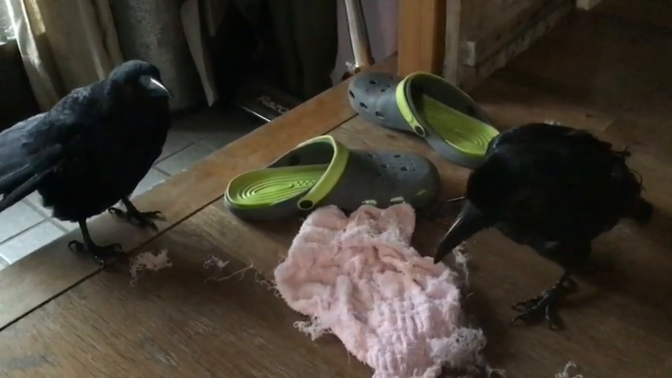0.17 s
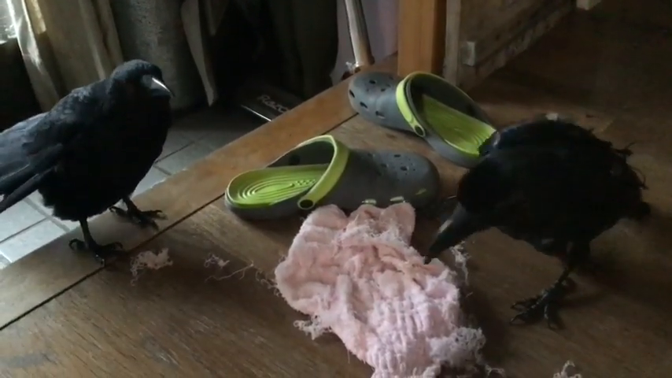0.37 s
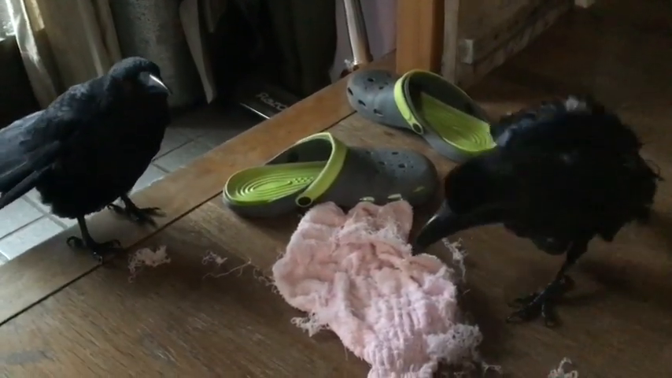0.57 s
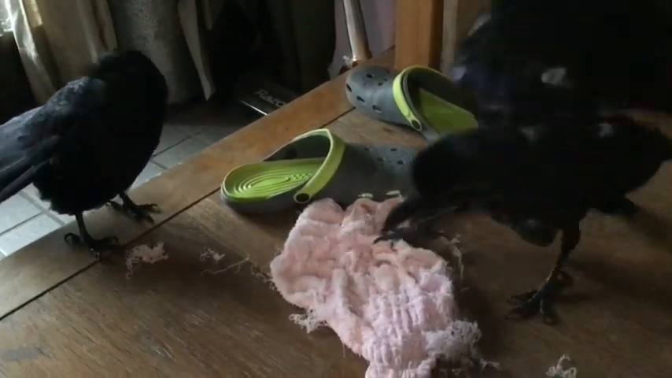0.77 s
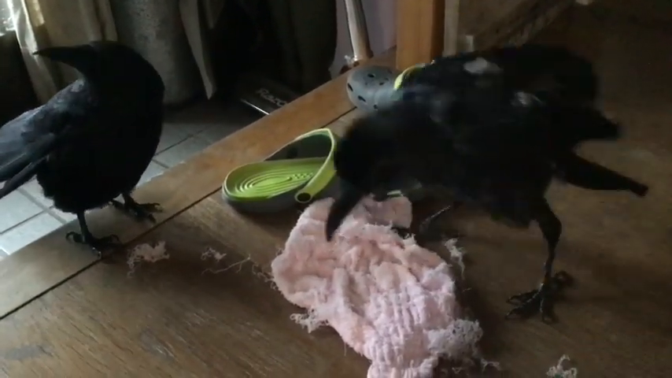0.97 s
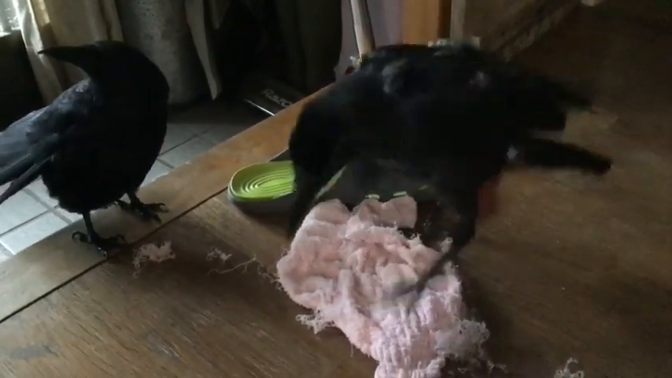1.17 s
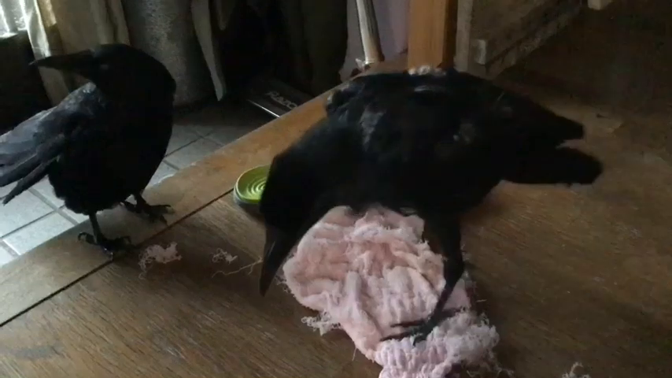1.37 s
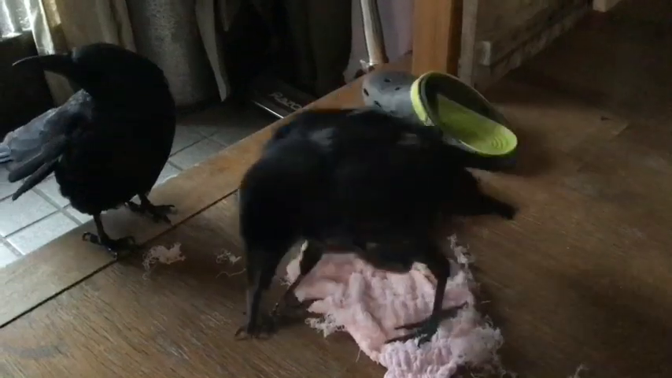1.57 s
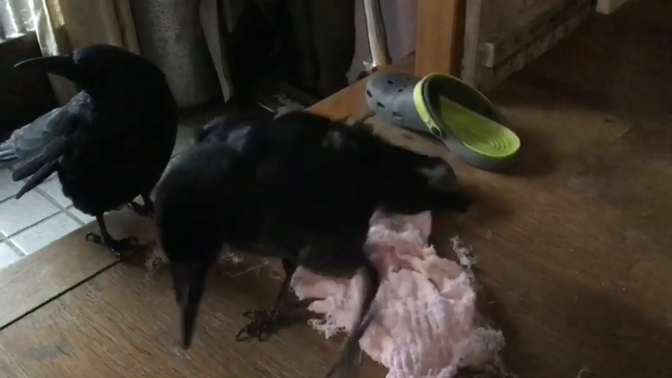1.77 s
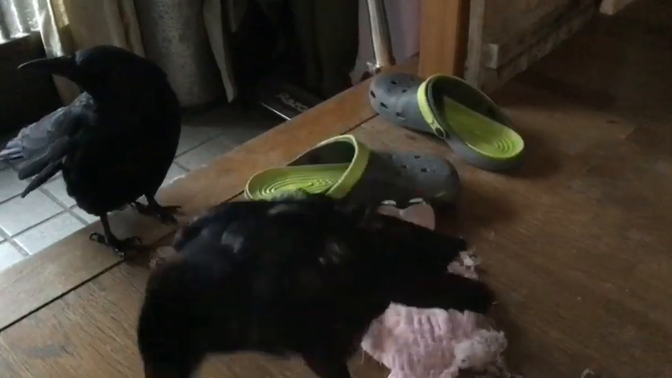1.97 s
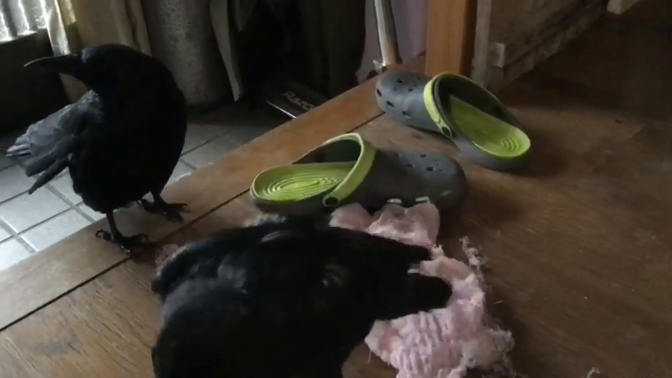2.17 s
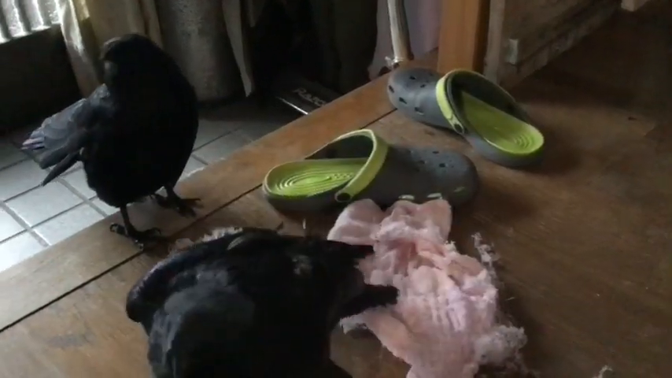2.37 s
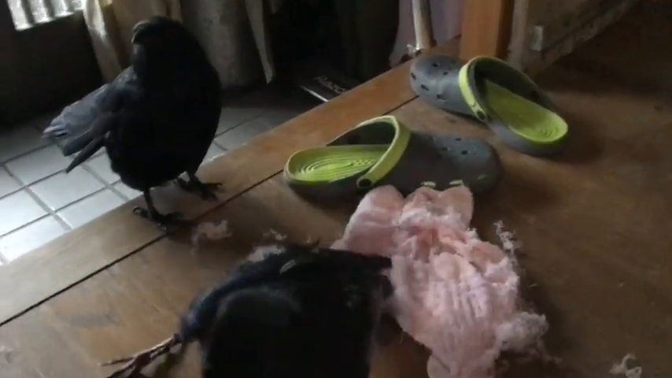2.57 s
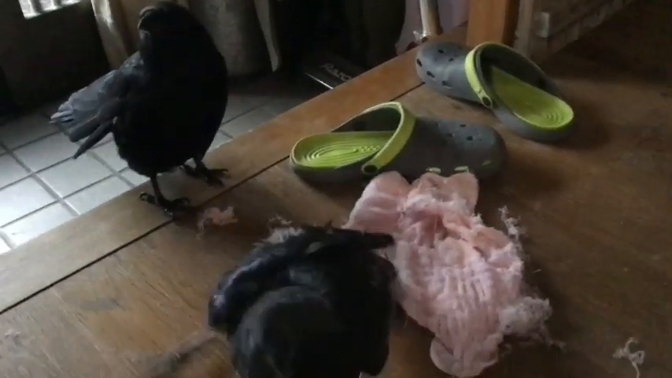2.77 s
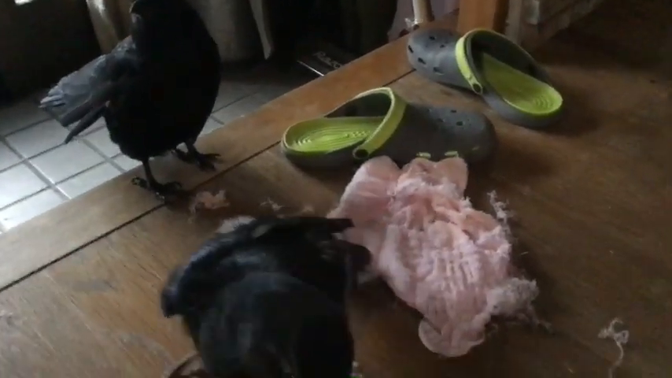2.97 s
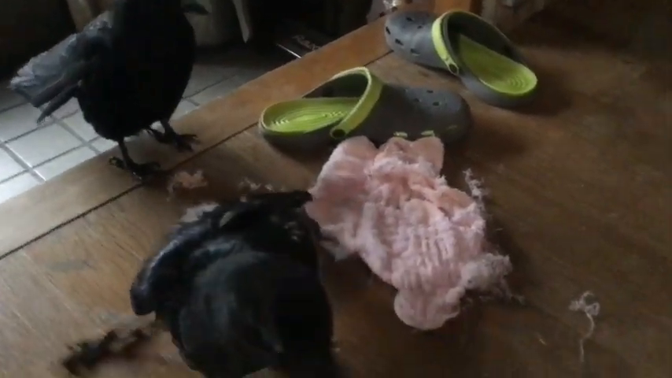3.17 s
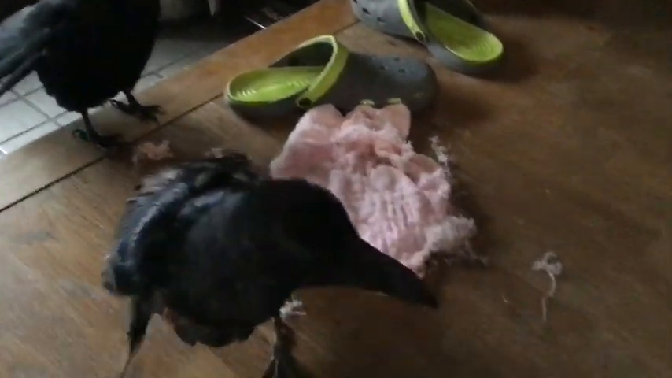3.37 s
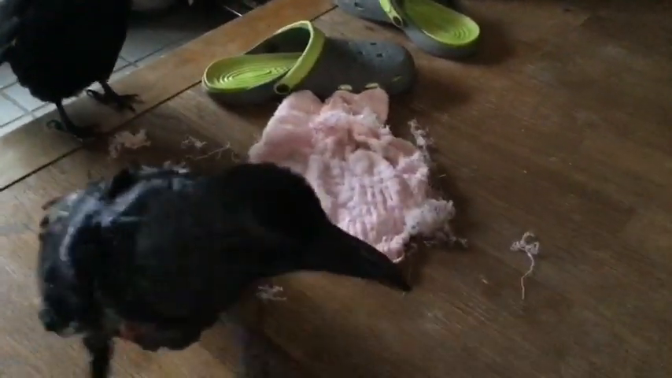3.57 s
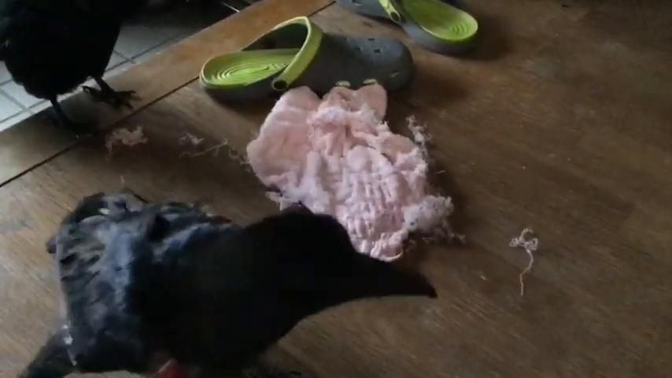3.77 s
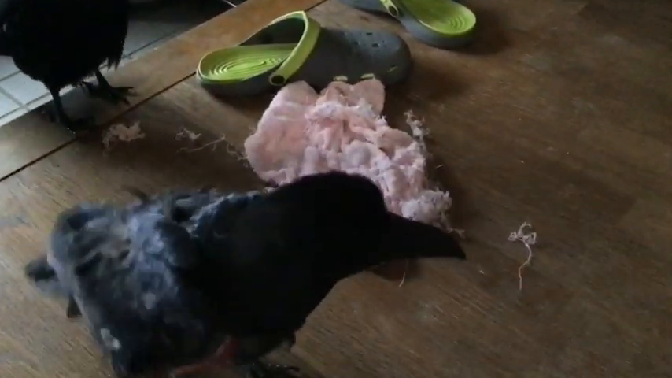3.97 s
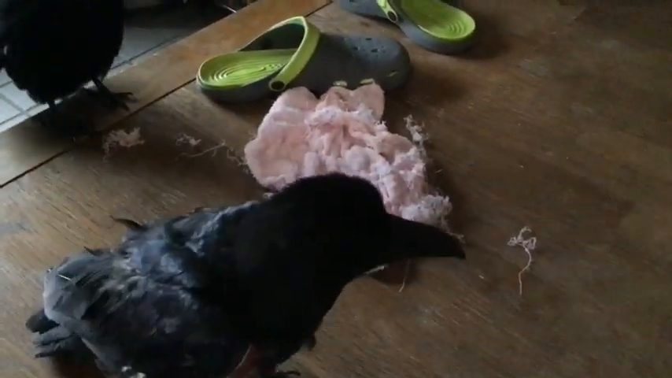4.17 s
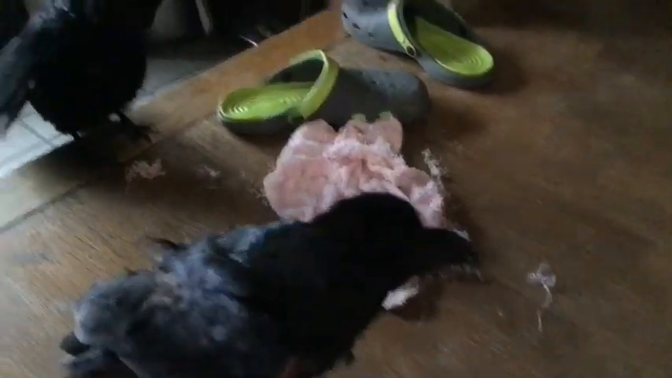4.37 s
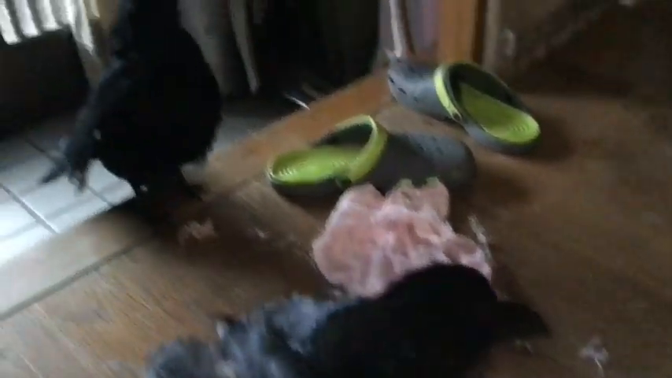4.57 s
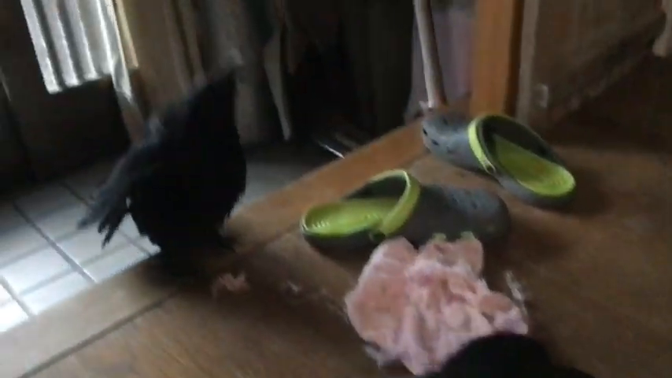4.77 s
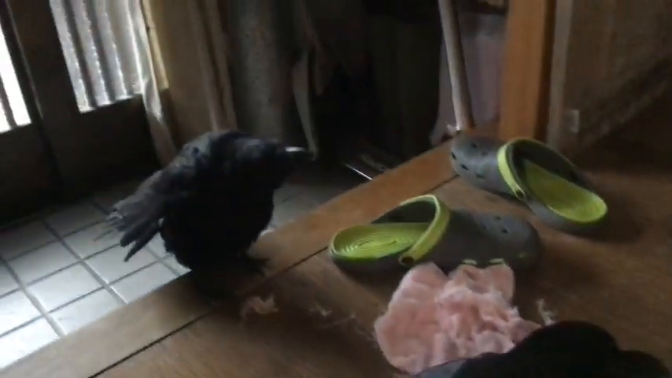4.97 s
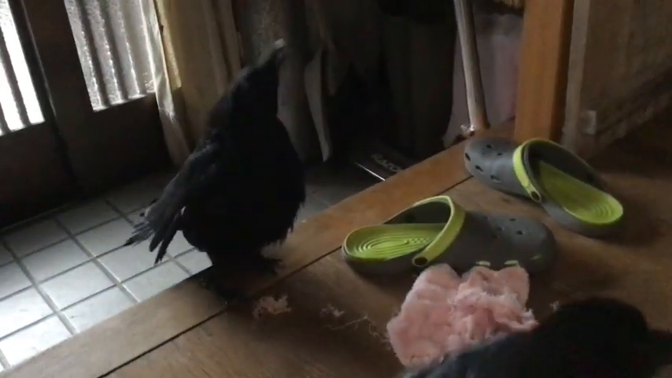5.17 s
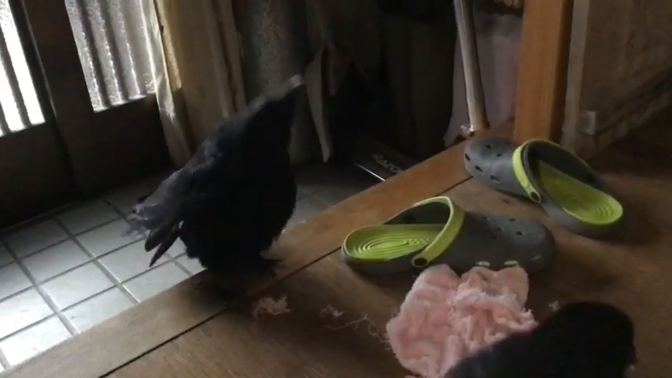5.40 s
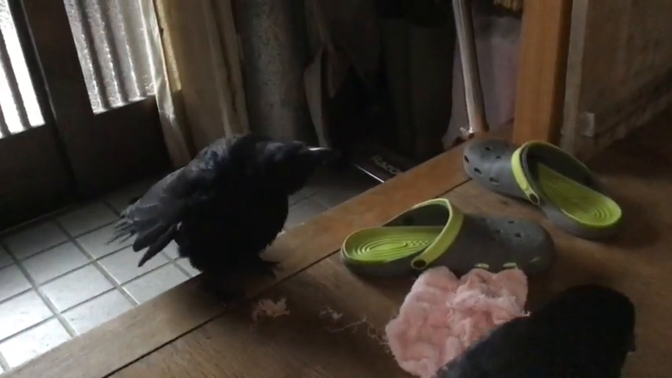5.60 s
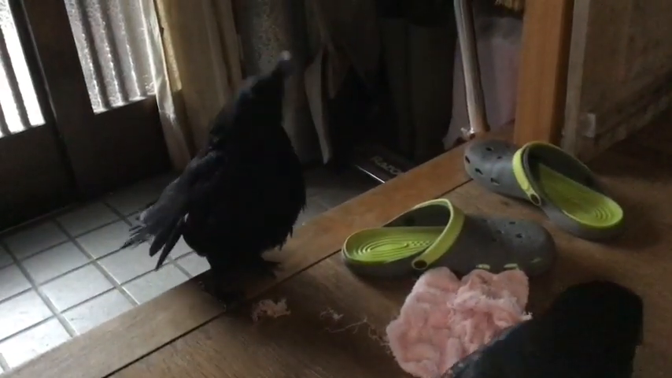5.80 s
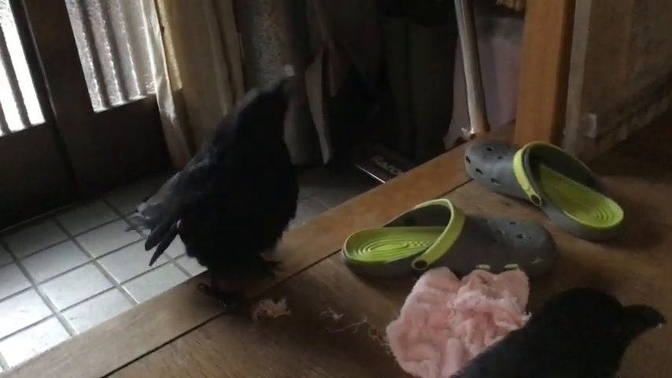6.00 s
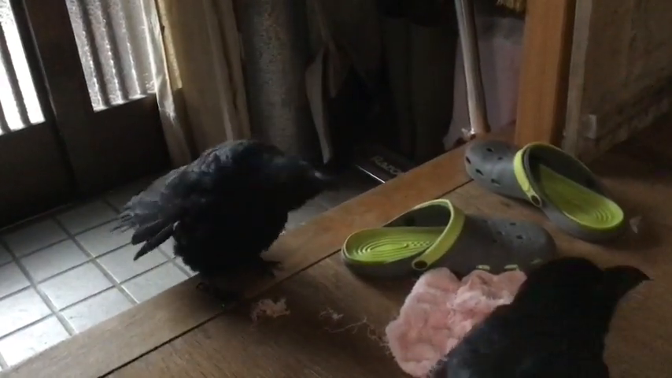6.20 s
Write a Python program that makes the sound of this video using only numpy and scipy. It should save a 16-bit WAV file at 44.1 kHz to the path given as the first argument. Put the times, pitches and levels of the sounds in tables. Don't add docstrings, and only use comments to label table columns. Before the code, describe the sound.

A quiet indoor hallway with a faint hiss and barely audible hum. From 0 to 1.5 seconds there are only soft low bumps of the hand-held microphone, light claw ticks and thin feather rustles near 0.75 and 1.0. Sharp, hard claw taps on wooden boards come at 1.56, 1.9, 2.23 and 2.5, some doubled, with a run of dull handling thuds from 2.35 to 3.5. Bright, dry brushing flicks at 3.3 and swells to 3.64, alongside more taps at 3.43 and 3.64. Then a crow caws loudly at 3.86, 4.49, 5.11 and 5.76, each about a quarter second: hoarse at the onset, clearer, then raspy again, with a rapid throaty buzz and short room reverberation. A faint cluck precedes the second. Between caws come rustles, low bumps and claw clicks, notably at 5.06; a last swish and tick fall near 6.18.

```python
import sys
import numpy as np
from scipy import signal
from scipy.io import wavfile
from scipy.ndimage import uniform_filter1d

SR = 44100
rng = np.random.default_rng(int(sys.argv[2]) if len(sys.argv) > 2 else 0)


def gain_from_decibels(decibels):
    exponent = np.asarray(decibels, float) / 20
    return 10 ** exponent


def output_pcm(signal):
    pcm = np.clip(np.atleast_2d(signal).T, -1, 1) * 32767
    wavfile.write(sys.argv[1], SR, np.round(pcm).astype(np.int16))


N = 275184

# onset in seconds, start of steady throbs in seconds, steady throb period in seconds, end in seconds.
CAWS = [
    (3.858, 3.909, .0174, 4.101),
    (4.490, 4.534, .0172, 4.731),
    (5.112, 5.167, .0170, 5.366),
    (5.762, 5.800, .0169, 5.997),
]
# time in seconds, pitch in Hz, effort in dB.
EFFORT = [
    [(3.858, 382, -19), (3.875, 394, -10), (3.935, 412, 2.5), (3.98, 425, -2), (4.04, 435, -.5),
     (4.1, 430, -5)],
    [(4.49, 396, -20), (4.523, 399, -7), (4.56, 418, 0), (4.62, 414, -1), (4.685, 405, -1.5),
     (4.73, 395, -13)],
    [(5.114, 399, -17), (5.14, 401, -7), (5.2, 420, 1), (5.26, 414, 1.5), (5.31, 413, 0), (5.36, 408, -8)],
    [(5.762, 381, -15), (5.8, 402, -2), (5.84, 419, 1), (5.89, 428, .5), (5.94, 436, 0), (6.0, 419, -4)],
]


def rms_one(x):
    return x / np.sqrt(np.mean(x ** 2) + 1e-20)


def in_time(rows):
    s, *columns = np.transpose(rows)
    return [np.interp(np.arange(N) / SR, s, c) for c in columns]


def at_hz(points, hz):
    table_hz, values = np.array(points).T
    return np.interp(np.log(hz), np.log(table_hz), values)


def passed(x, hz, kind, order=2):
    return signal.sosfilt(signal.butter(order, hz, kind, fs=SR, output="sos"), x + 1e-18)


def resonate(x, modes, order=1):
    out = 0
    for k, (hz, width, level_db) in enumerate(modes):
        r = np.exp(-np.pi * width / SR)
        numerator = [(1 - r * r) / 2, 0, (r * r - 1) / 2]
        denominator = [1, -2 * r * np.cos(2 * np.pi * hz / SR), r * r]
        y = x + 1e-18
        for _ in range(order):
            y = signal.lfilter(numerator, denominator, y)
        out = out + (-1) ** k * gain_from_decibels(level_db) * y
    return out


def wobble(rate):
    r = np.exp(-2 * np.pi * rate / SR)
    settled = signal.lfilter([1], [1, -2 * r, r * r], rng.standard_normal(N + 9000))[9000:]
    return rms_one(settled)


def bands(white, gain_at):
    edges = 25 * 2 ** np.arange(0, 9.6, .5)
    return sum(gain_at(np.sqrt(a * b)) * passed(white[k % 2], [a, b], "band")
               for k, (a, b) in enumerate(zip(edges, edges[1:])))


def hush():
    # frequency in Hz, density in dB per Hz.
    hush_spectrum = [(24, -44), (40, -27), (87, -10), (220, 0.5), (412, -13), (479, -7), (733, -12.5),
                     (942, -8), (1150, -17.5), (1550, -11.5), (3140, -26), (9450, -24), (13800, -35),
                     (16000, -35)]
    hush_db, hum_hz, hum_db = -64, 99, -71.5
    air = rms_one(bands(rng.standard_normal((2, N)), lambda hz: gain_from_decibels(at_hz(hush_spectrum, hz))))
    hum = np.sin(2 * np.pi * hum_hz * np.arange(N) / SR)
    return gain_from_decibels(hush_db) * air + gain_from_decibels(hum_db + 2.2 * wobble(6.5)) * hum


def thumps():
    # time
    # in seconds, peak in dB.
    single_shifts = [(0.195, -38), (0.758, -36), (0.778, -46), (1.231, -56), (2.345, -38.5), (2.379, -45),
                     (2.458, -45), (2.498, -43), (2.679, -42), (2.843, -38), (2.968, -40), (3.052, -40),
                     (3.084, -38.5), (3.184, -53), (3.316, -39), (3.352, -46), (3.392, -39), (3.466, -40.5),
                     (3.655, -34), (3.685, -47), (4.716, -31), (4.951, -39), (5.066, -49), (5.287, -34),
                     (5.472, -41), (5.935, -38)]
    # time in seconds, peak in dB.
    double_shifts = [(2.419, -44), (2.525, -34), (2.627, -38.5), (2.742, -39), (2.922, -37.5), (3.143, -48)]
    # frequency in Hz, width in Hz, level in dB.
    shell_modes = [(102.6, 64, -7.5), (156, 72, 0.5), (316, 120, -15), (430, 79, -20.5)]
    slip_s, slip_loss_db = .022, 3
    lag_cycles = 1.2
    second_slips = [(s + slip_s, db - slip_loss_db) for s, db in double_shifts]
    s, peak_db = np.transpose(single_shifts + double_shifts + second_slips)
    strengths = rng.standard_normal((len(s), len(shell_modes))).T
    out = 0
    for mode, spread in zip(shell_modes, strengths):
        push = np.zeros(N)
        lag_s = lag_cycles * (1 / mode[0] - 1 / 170)
        push[np.round((s + lag_s) * SR).astype(int)] = gain_from_decibels(peak_db + 45 + 3.0 * spread)
        out = out + resonate(push, [mode], order=2)
    return passed(out, 35, "high")


def rustle():
    # peak time in seconds, peak in dB, seconds to swell by 20 dB,
    # seconds to fade by 20 dB, duller share in relative dB.
    brushes = [(0.094, -74, .05, .2, 3), (0.33, -69, .05, .3, -6), (0.5, -73, .1, .15, -2),
               (0.75, -51, .08, .09, -5), (0.818, -56, .03, .1, -8), (1.0, -68, .1, .03, -2),
               (1.03, -52, .011, .06, -8), (1.182, -66, .08, .2, -14), (1.264, -63.5, .05, .18, -5),
               (1.75, -71, .2, .06, -4), (2.06, -53.5, .05, .045, 7), (2.45, -59, .015, .3, -6),
               (2.76, -61, .025, .05, 11), (2.85, -72, .02, .1, 14), (2.97, -73, .08, .1, 8),
               (3.13, -74, .15, .1, 9), (3.2, -64, .04, .06, 5), (3.3, -43, .008, .05, -5),
               (3.638, -42, .09, .011, -7), (4.346, -43, .03, .03, -6), (4.868, -41.5, .03, .06, 2),
               (5.456, -40.5, .04, .07, -8), (5.73, -59.5, .011, .015, -5), (6.1, -54, .1, .2, -12),
               (6.182, -43, .05, .05, 0)]
    feather_band = [5200, 11600]
    t, level, dull_level = np.arange(N) / SR, 0, 0
    for s, peak_db, swell_s, fade_s, dull_db in brushes:
        away = np.maximum((s - t) / swell_s, (t - s) / fade_s).clip(0, 10)
        stroke = gain_from_decibels(peak_db - 20 * away)
        level = level + stroke
        dull_level = dull_level + gain_from_decibels(dull_db) * stroke
    grain_size = np.minimum(rng.exponential(1, (2, N)), 5)
    grains = rng.standard_normal((2, N)) * gain_from_decibels(2.6 * grain_size + 0.5 * wobble(40))
    bright = rms_one(passed(grains[0], feather_band, "band"))
    dull = rms_one(resonate(grains[1], [(2591, 5100, 0)]))
    return gain_from_decibels(2) * (level * bright + dull_level * dull)


def taps():
    # time in seconds, peak in dB, low knock in relative dB, bright tip in relative dB.
    steps = [(1.5589, -9, -18, -8.5), (1.8921, -6.5, -25.5, -4), (1.9018, -17.5, -9.5, -1.5),
             (2.231, -13, -43, -1), (2.2313, -18.5, -17, -5), (2.2404, -8.5, -26, -14),
             (2.5162, -13.5, -18.5, -10.5), (2.5234, -23, -13, -14), (3.4334, -19, -24, -7.5),
             (3.4436, -19.5, -25, 0), (3.6421, -8, -24, -9), (3.6496, -11, -15, -30),
             (4.4935, -22, -14, -6), (5.0589, -19.5, -20, -7.5), (5.0634, -11.5, -23.5, -16.5)]
    # time in seconds,
    # peak in dB, bright tip in relative dB.
    ticks = [(0.4339, -33, -34), (0.8074, -32, -21), (0.816, -28.5, -16), (1.0251, -32.5, -6),
             (1.0334, -29, -18), (2.1046, -30, -7), (2.4488, -35, -5), (2.4565, -35, -3), (2.5128, -31, -8),
             (2.7501, -25, -35.5), (2.8325, -23, -45), (2.8549, -32, -4), (3.2924, -27, -10),
             (3.5867, -28.5, -17), (4.3425, -33, -14.5), (4.3504, -24, -15), (4.8678, -21, -13.5),
             (5.5643, -24, -8), (6.1764, -24.5, -5)]
    # frequency in Hz, width in Hz, level in dB.
    board_modes = [(170, 20, -7), (380, 340, -0.5), (620, 180, 2.5), (1026, 700, 0.5), (1400, 210, 5),
                   (2050, 350, 0.5)]
    tick_knock_db, step_scatter_s, tick_scatter_s = -26, .0055, .005
    low_hz, split_hz, top_hz = 2200, 7000, 12500
    claw, tip, knock = np.zeros((3, 2, N))
    t = np.arange(round(.04 * SR)) / SR
    rows = [(*row, step_scatter_s) for row in steps]
    rows += [(s, db, tick_knock_db, tip_db, tick_scatter_s) for s, db, tip_db in ticks]
    shape = len(rows), len(t)
    grit = rng.standard_normal(shape) * rng.exponential(1, shape)
    for (s, peak_db, low_db, tip_db, scatter), contacts in zip(rows, grit):
        hit = [.14, 0] * (contacts * np.exp(-t / max(scatter, 3e-4)))[:, None]
        hit[0] = 1, np.sqrt(1 + np.sum(hit ** 2))
        at = round(s * SR)
        span = slice(at, at + len(t))
        claw[:, span] += gain_from_decibels(peak_db) * hit.T
        tip[:, span] += gain_from_decibels(peak_db + tip_db) * hit.T
        knock[:, span] += gain_from_decibels(peak_db + low_db) * np.abs(hit.T)
    click = gain_from_decibels(2) * passed(claw, [low_hz, split_hz], "band")
    click = click - gain_from_decibels(13) * passed(tip, [split_hz, top_hz], "band")
    return click + gain_from_decibels(27) * passed(resonate(knock, board_modes), 110, "high")


def clucks():
    # time in seconds, peak in dB.
    cluck_times = [
        (4.4094, -43.5),
    ]
    puffs = np.zeros(N)
    for s, peak_db in cluck_times:
        puffs[round(s * SR)] = gain_from_decibels(peak_db + 38.5)
    return resonate(puffs, [(1200, 250, 0)], order=2)


def throbs():
    quick_throb_s, jitter_s, spread_db = .0135, .0006, 1.2
    leak_s, leak_db = .014, -44
    base_rasp_db, rasp_fade_db = -11, -5
    rasp_full_db = -.5
    progress, gain, rasp, opened = np.zeros((4, N))
    for (onset, steady, period, end), rows in zip(CAWS, EFFORT):
        quick = np.linspace(onset, steady, round((steady - onset) / quick_throb_s), endpoint=False)
        s = np.concatenate([[onset - leak_s], quick, np.arange(steady, end - period / 2, period)])
        chance = rng.standard_normal((24, 2))[:len(s)]
        effort_s, _, effort_db = np.transpose(rows)
        peak_db = np.interp(s, effort_s, effort_db) + spread_db * chance[:, 0]
        peak_db[0] = leak_db
        rasp_db = base_rasp_db + rasp_fade_db * ((s - onset) / (end - onset)) ** 4
        starts = s + jitter_s * chance[:, 1] * (s > onset)
        edges = np.round(np.append(starts, end) * SR).astype(int)
        for level_db, rel_db, a, b in zip(peak_db, rasp_db, edges, edges[1:]):
            progress[a:b] = np.linspace(0, 1, b - a, endpoint=False)
            gain[a:b] = gain_from_decibels(level_db)
            rasp[a:b] = gain_from_decibels(min(level_db, rasp_full_db) + rel_db)
        since_s = np.arange(edges[-1] - edges[0]) / SR
        opened[edges[0]:edges[-1]] = np.minimum(since_s / 0.12, 1)
    return progress, gain, rasp, opened


def caws():
    # frequency in Hz, width in Hz, level in dB.
    throat_modes = [(330, 43, -19.5), (425, 120, -31), (537, 180, -24), (727, 170, -18), (975, 243, -10.5),
                    (1210, 258, -6.5), (1511, 210, -9.5)]
    beak_modes = [(1721, 660, -7.5), (2186, 255, -13.5), (2319, 150, -12), (2809, 496, -10),
                  (3970, 720, -29.5)]
    rasp_modes = [(5780, 530, -9), (7190, 1470, -6), (7810, 360, -5.5), (8690, 1700, -5.5),
                  (10600, 1800, -20.5)]
    air_modes = [(10500, 1300, -14), (12440, 740, -26), (13600, 2100, -22.5)]
    # seconds after onset, roughness 0-1, beak opening in dB.
    hoarse = [
        (0, .7, 1),
        (.045, .6, 1.5),
        (.075, .2, -5),
        (.14, .25, -3),
        (.19, .45, 3),
        (.245, .8, 4),
    ]
    gap_centres_hz, gap_width_hz = (4750, 5120, 5280), 400
    hz, _ = in_time(sum(EFFORT, []))
    rough, beak_db = in_time([(caw[0] + s, rough, db) for caw in CAWS for s, rough, db in hoarse])
    rough = np.clip(rough, 0, 1)
    progress, gain, rasp, opened = throbs()

    smooth = round(.001 * SR)
    lean, narrow = 0.66 + 0.23 * opened, 2.6 - 1.55 * opened
    bump = np.sin(np.pi * progress ** lean) ** narrow
    swell = uniform_filter1d(gain * (0.017 + np.tanh(1.19 * bump)), smooth)
    slap = np.exp(-((progress - .16) / 0.14) ** 2)
    burst = uniform_filter1d(rasp * (0.31 + 0.28 * np.sin(np.pi * progress) + 0.53 * slap), smooth)

    sagging = 1 + .12 * (.55 - progress) + .045 * rough * wobble(120)
    turns = np.cumsum(hz * sagging / SR)
    fresh = np.diff(progress, prepend=0) < 0
    cycle = turns - np.maximum.accumulate(turns * fresh)
    closes = np.diff(np.floor(cycle), prepend=0) != 0
    snaps = rms_one(closes * gain_from_decibels(2.5 * rough * wobble(300)))
    gate = np.exp(-(cycle % 1) / 0.46)
    breath = rng.standard_normal((2, N)) * gate
    puff = rms_one(breath[0])

    throat = resonate(swell * (snaps + .75 * rough * puff), throat_modes, order=2)
    mixed = np.sqrt(1 - rough) * snaps + 1.04 * np.sqrt(rough) * puff
    beak = resonate(swell * mixed, beak_modes, order=2)
    voice = passed(throat + gain_from_decibels(beak_db) * (0.4 + 0.32 * opened) * beak, 275, "high", order=4)
    span = round(.016 * SR)
    wanted = uniform_filter1d(swell ** 2, span).clip(0)
    voice *= np.sqrt(wanted / (uniform_filter1d(voice ** 2, span) + 1e-7))

    rush = burst * (.4 * snaps + rms_one(breath[1]))
    hiss = resonate((0.38 + 1.05 * opened) * rush, rasp_modes, order=2)
    for k, gap_hz in enumerate(gap_centres_hz):
        share = np.clip(1 - np.abs(2 * opened - k), 0, 1)
        hiss = hiss - gain_from_decibels(2.5) * resonate(share * rush, [(gap_hz, gap_width_hz, 0)], order=2)
    air = resonate(opened * gain ** 0.8 * burst * puff, air_modes, order=2)
    return gain_from_decibels(-7.3) * voice + gain_from_decibels(8) * hiss - gain_from_decibels(10) * air


def hall(x):
    # frequency in Hz, time to decay by 60 dB in seconds.
    decay_times = [(200, 0.65), (530, 0.33), (1390, 0.35), (3680, 0.36), (9700, 0.29)]
    t = np.arange(round(.6 * SR)) / SR
    tail = bands(rng.standard_normal((2, len(t))), lambda hz: gain_from_decibels(-60 * t / at_hz(decay_times, hz)))
    tail *= np.clip((t - .001) / 0.0075, 0, 1)
    return signal.fftconvolve(x, tail / np.sqrt(np.sum(tail ** 2)))[:N]


def scene():
    far = caws() + clucks()
    floor, floor_clicks = taps()
    near = rustle()
    wet = hall(gain_from_decibels(-6.5) * far + gain_from_decibels(-6.0) * floor_clicks + gain_from_decibels(-8.5) * near)
    return (far + floor + near + wet + thumps() + hush())[None]


def low_pass(x):
    return signal.sosfilt(signal.butter(12, 16450, fs=SR, output="sos"), x)


def record(dry):
    x = dry + gain_from_decibels(-52) * passed(dry ** 2, [45, 250], "band")
    x = x / (1 + np.abs(x / .97) ** 5) ** (1 / 5)
    mix = passed(passed(x, 38, "high"), 15650, "low", order=8)
    return low_pass(mix)


dry = scene()
out = record(dry)
output_pcm(out)
```